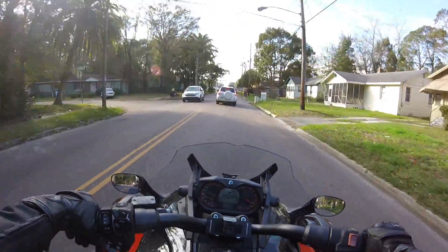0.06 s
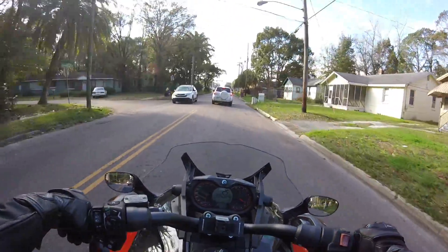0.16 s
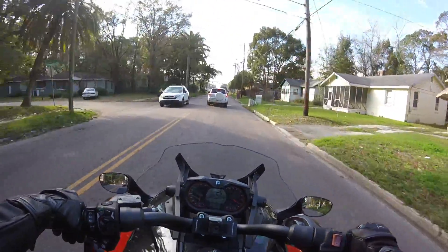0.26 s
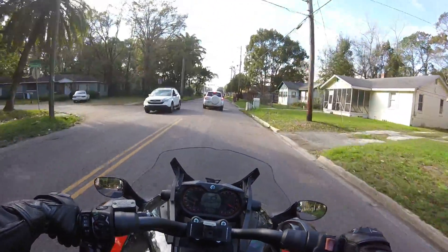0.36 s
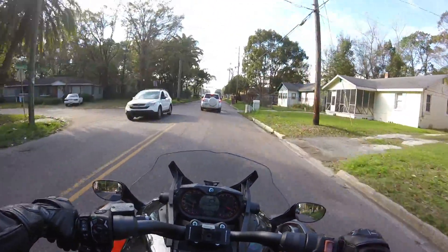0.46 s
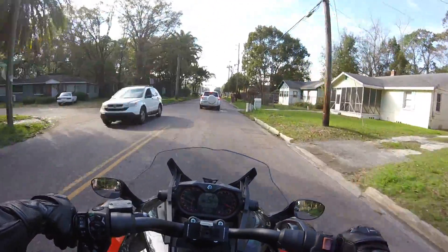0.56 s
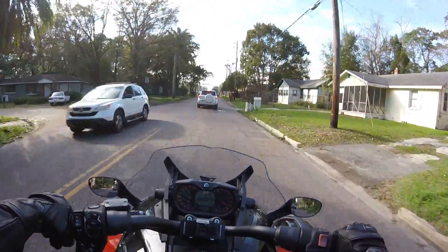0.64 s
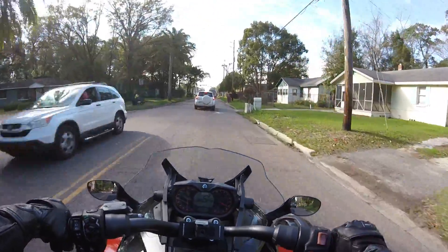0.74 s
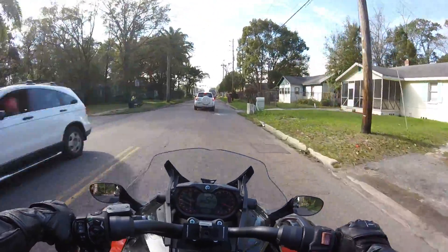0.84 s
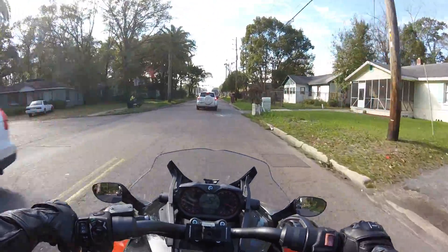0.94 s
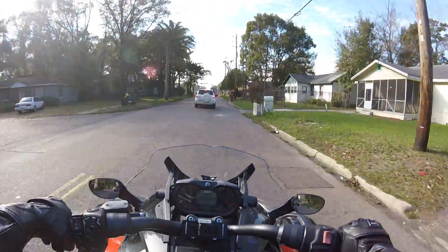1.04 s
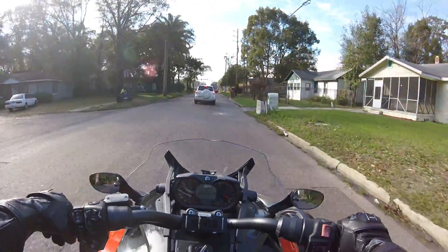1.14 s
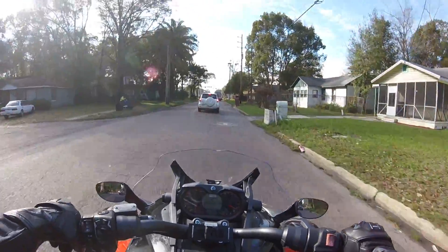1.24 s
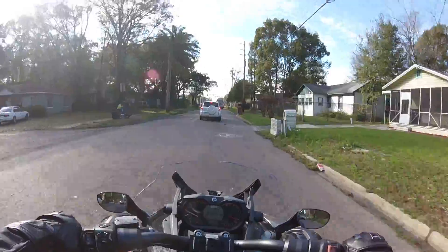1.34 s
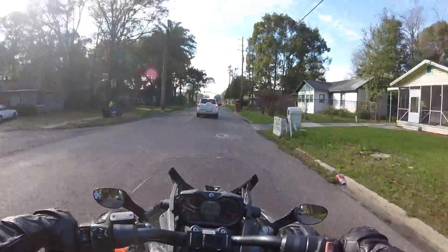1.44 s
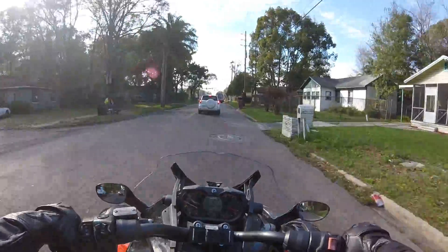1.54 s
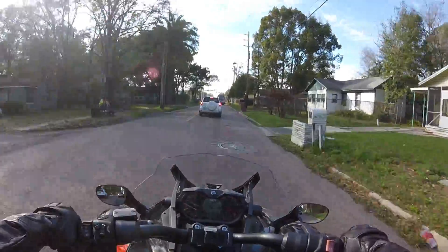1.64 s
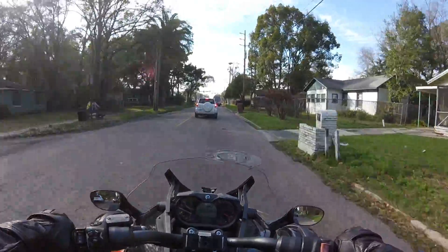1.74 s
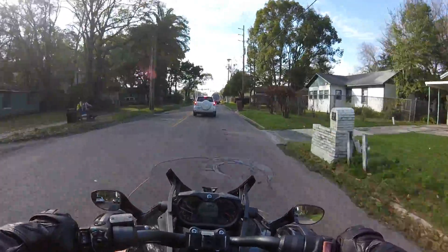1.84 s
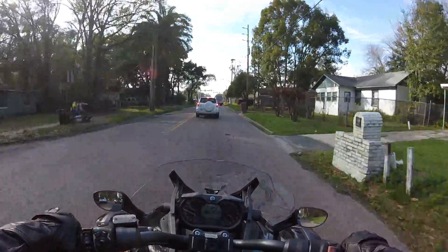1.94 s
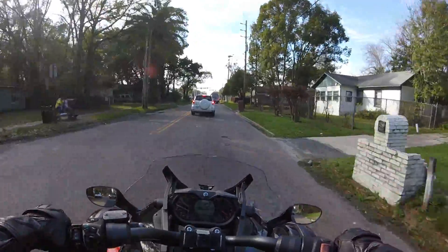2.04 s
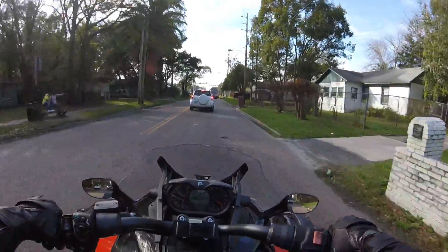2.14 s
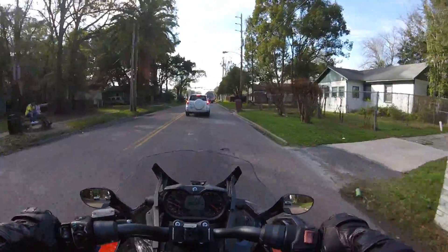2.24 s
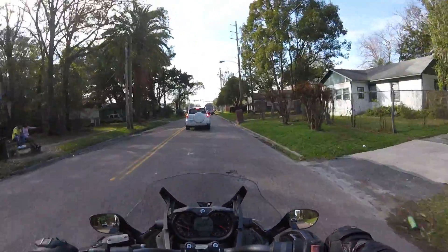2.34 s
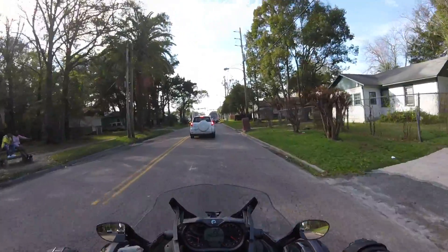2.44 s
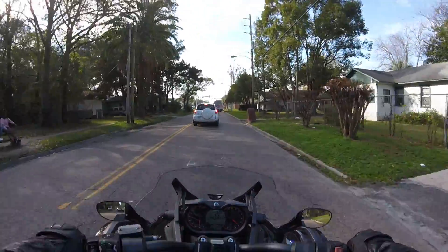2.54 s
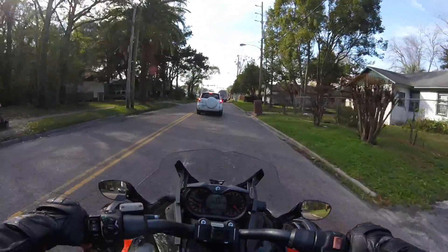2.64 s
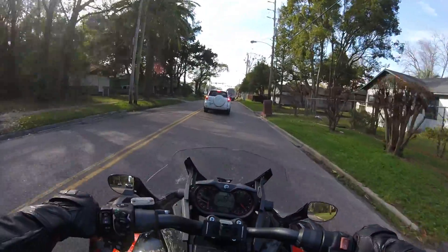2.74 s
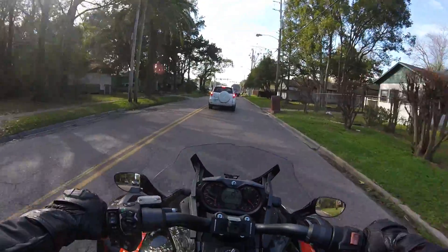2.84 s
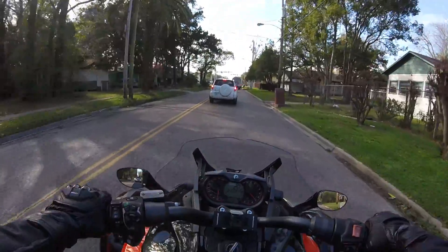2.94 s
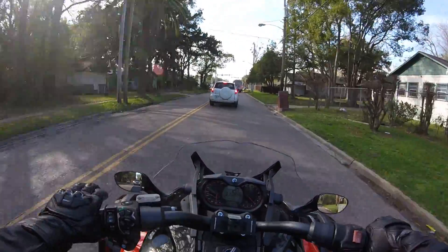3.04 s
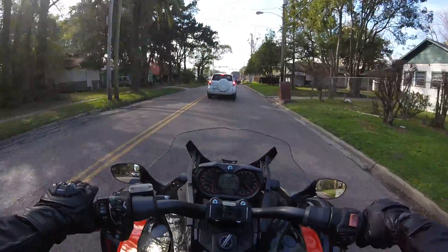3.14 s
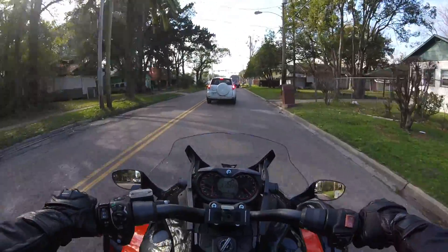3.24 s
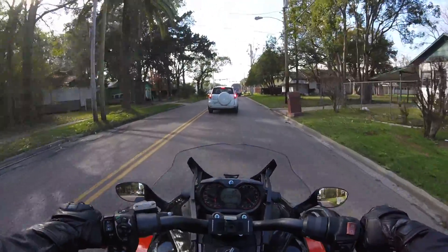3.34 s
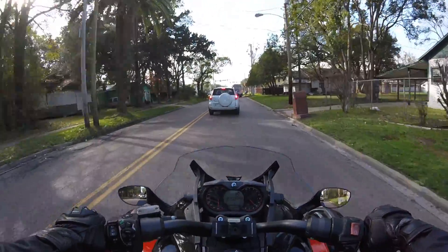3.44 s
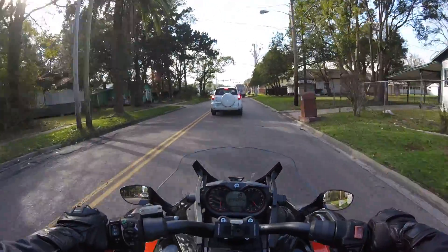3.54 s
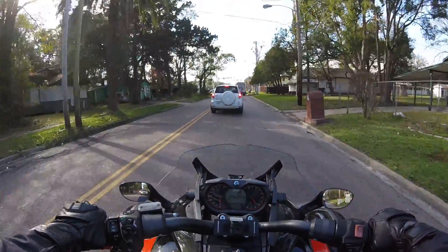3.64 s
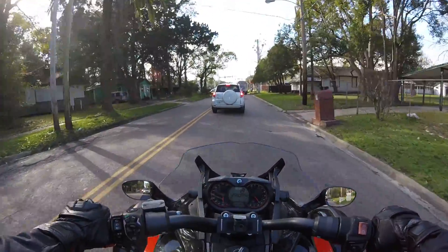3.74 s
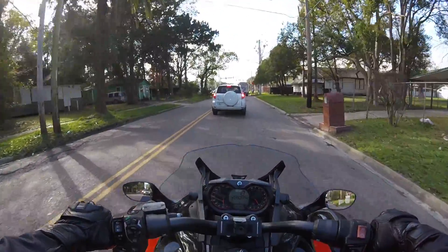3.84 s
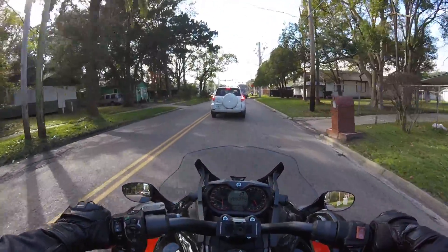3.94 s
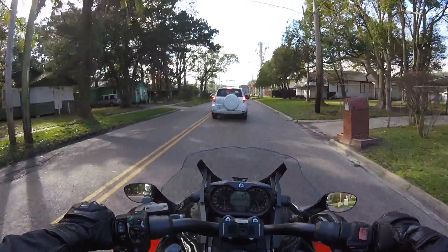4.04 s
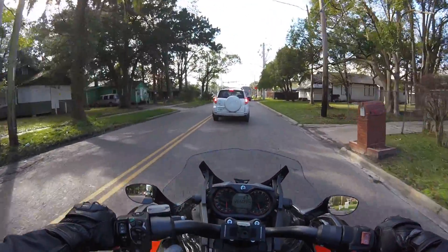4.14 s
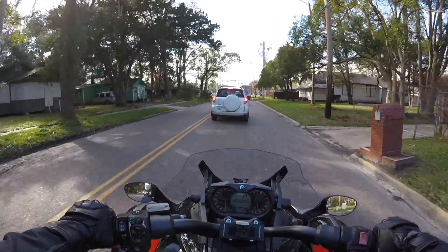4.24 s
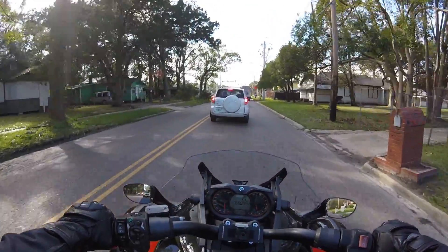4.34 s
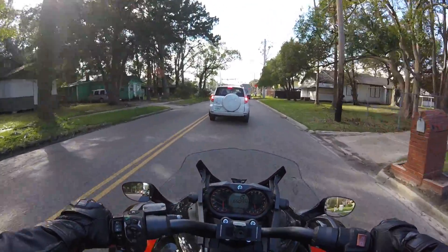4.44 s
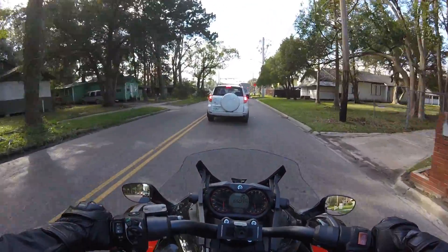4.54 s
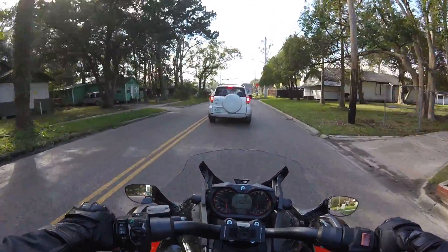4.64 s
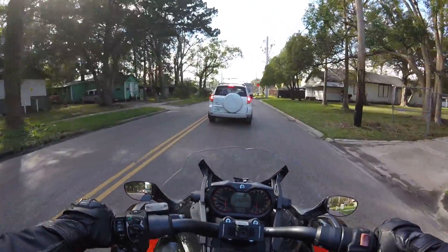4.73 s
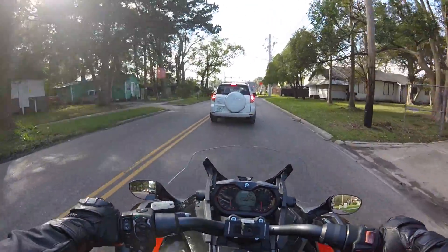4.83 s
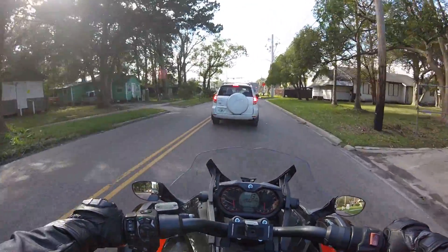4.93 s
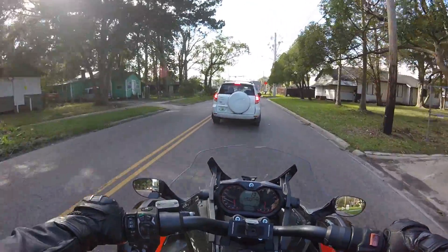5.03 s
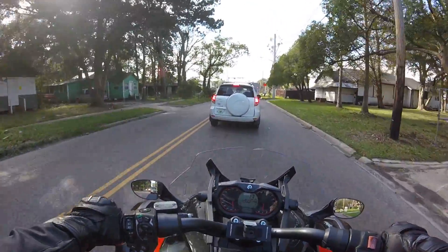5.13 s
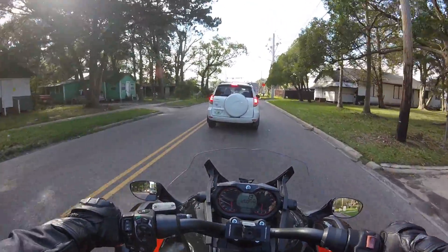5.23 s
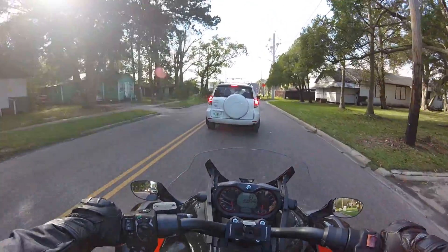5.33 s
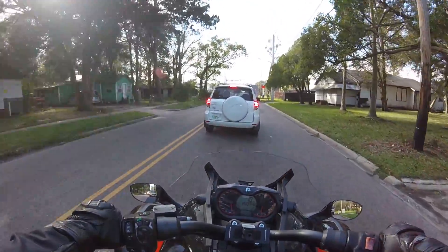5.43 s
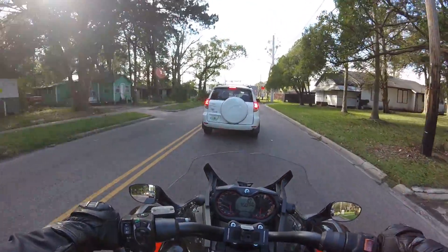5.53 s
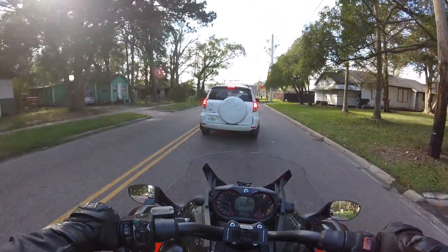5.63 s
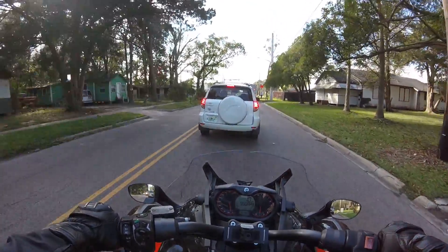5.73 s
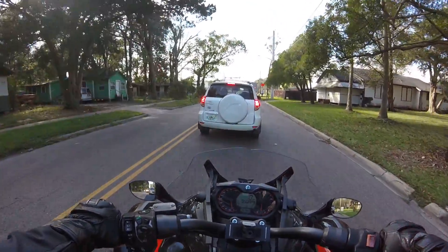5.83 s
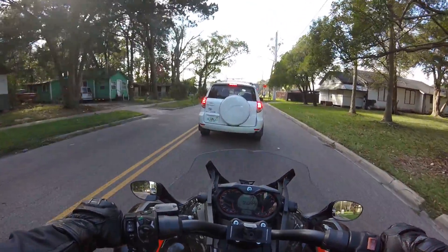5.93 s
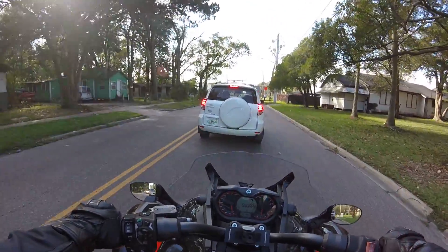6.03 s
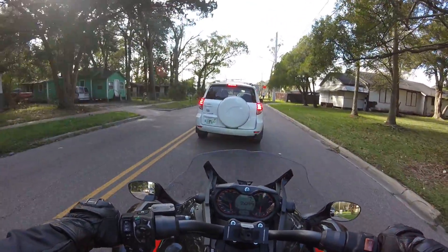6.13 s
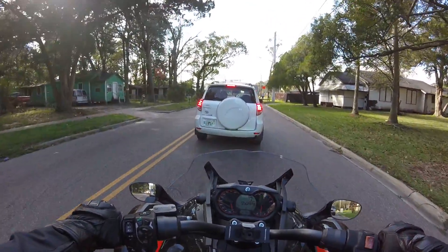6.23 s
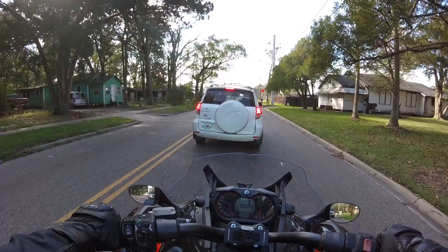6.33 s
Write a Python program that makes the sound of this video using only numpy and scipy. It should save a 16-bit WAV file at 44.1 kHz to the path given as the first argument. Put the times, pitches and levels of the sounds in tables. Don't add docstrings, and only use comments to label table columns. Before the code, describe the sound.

A helmet microphone outdoors captures a three-cylinder engine close below. From 0 to 1.5 seconds it cruises on a deep, nearly steady drone around 95 pulses a second, with mechanical hum, valve-gear whirr, tyre hiss and low wind buffeting. An oncoming car's tyres whoosh softly past around 1.0. At about 1.6 the throttle shuts: the exhaust becomes ragged, burbling with irregular muffled pops, densest from 1.8 to 2.7 and scattered until 4.1. Coarse road rush swells near 1.9, 2.4 and 3.7, with short wind gusts between. A loose bracket taps sharply at 2.54 and loudest at 2.62, then more weakly at 3.1, 3.4 and 3.9. The pitch slides down, dropping fast around 4.1 to 4.4 as the clutch lets go. From 5.1 to 6.4 a quiet, even idle of about 24 soft pulses a second continues, with faint tappet rattle, hiss, a barely audible thin whine and one tiny tap at 6.1.

```python
import sys
import numpy as np
from scipy import signal
from scipy.fft import rfft, irfft, next_fast_len
from scipy.io import wavfile
from scipy.ndimage import map_coordinates

SR = 44100
rng = np.random.default_rng(int(sys.argv[2]) if len(sys.argv) > 2 else 0)


def linear_from_db(decibels):
    return 10 ** (np.asarray(decibels, float) / 20)


def wrap_up_sound(samples):
    columns = np.atleast_2d(samples).T
    tamed = np.clip(columns, -1, 1)
    steps = np.round(tamed * 32767).astype(np.int16)
    wavfile.write(sys.argv[1], SR, steps)


N = 281358
SHUT_S = 1.61
IDLE_HZ = 24

# (time [s], peak level [dB], level of the sharp edge [dB])
POPS = [(1.571, -40.5, 1), (1.682, -44, -8), (1.725, -40, -13), (1.785, -32.5, -13), (1.831, -33, -17),
        (1.873, -32.5, -22), (1.93, -31.5, -10), (2.065, -36, -18), (2.111, -37, -2), (2.192, -33, -5),
        (2.215, -31.5, -2.5), (2.296, -28.5, -2.5), (2.342, -37.5, -4), (2.439, -31.5, -10),
        (2.453, -38.5, -10), (2.6861, -33.5, -12), (2.76, -42, -18), (2.991, -36.5, -21), (3.213, -43, -2),
        (3.363, -37, -11), (3.446, -45, -4), (3.503, -43.5, -10), (3.533, -47, -10), (3.557, -42, -18),
        (3.661, -35, -8), (3.692, -38.5, -8), (3.721, -42, -2), (3.89, -42, -17), (4.043, -36.5, -10),
        (4.061, -37, -12)]


def unit(x):
    return x / np.sqrt(np.mean(x ** 2) + 1e-20)


def along(points, hz):
    f, v = np.transpose(points)
    return np.interp(np.log(hz + 1), np.log(f + 1), v)


def curves(rows):
    s, *cols = np.transpose(rows)
    return [np.interp(np.arange(N) / SR, s, c) for c in cols]


def wobble(rate):
    knots = rng.standard_normal(int(N * rate / SR) + 4)
    return map_coordinates(knots, [np.arange(N) * rate / SR])


def passed(s, takes_s):
    return np.clip((np.arange(N) / SR - s) / takes_s + 0.5, 0, 1)


def bump(s, length_s):
    return np.exp(-(2 * (np.arange(N) / SR - s) / length_s) ** 2 / 2)


def filtered(x, response):
    m = next_fast_len(N + SR // 2)
    return irfft(rfft(x, m) * response(np.fft.rfftfreq(m, 1 / SR)), m)[:N]


def dulled(x, hz, order):
    return filtered(x, lambda f: 1 / (1 + 1j * f / hz) ** order)


def causal(points):
    grid = np.fft.rfftfreq(2 * SR, 1 / SR)
    cepstrum = irfft(np.log(linear_from_db(along(points, grid)) + 1e-6))
    cepstrum[1:SR] *= 2
    cepstrum[SR + 1:] = 0
    h = np.exp(rfft(cepstrum))
    return lambda hz: np.interp(hz, grid, h.real) + 1j * np.interp(hz, grid, h.imag)


def resonant(modes, flip=-1):
    def response(f):
        total = 0
        for k, (center, width, db) in enumerate(modes):
            mode = 1j * f * width / (center * center - f * f + 1j * f * width)
            total = total + flip ** k * linear_from_db(db) * mode
        return total
    return response


def noise(spectrum):
    return unit(filtered(rng.standard_normal(N), lambda hz: linear_from_db(along(spectrum, hz))))


def struck(times, db, modes, flip=-1):
    blows = np.zeros(N)
    blows[np.round(times * SR).astype(int)] = linear_from_db(db) * SR / (2 * np.pi * modes[0][1])
    return filtered(blows, resonant(modes, flip))


def crank():
    # (time [s], firing rate [Hz])
    firing = [(0.0, 97.17), (0.75, 93.79), (1.125, 95.44), (1.5, 93.8), (1.625, 90.08), (2.0, 89.54),
              (2.375, 83.06), (3.375, 73.03), (3.875, 64.07), (4.125, 50.93), (4.29, 44.6), (4.36, 32.8),
              (4.56, 34.4), (4.75, 29.53), (5.125, 24.34), (5.375, 24.2), (5.75, 24.1), (6.38, 22.9)]
    hz = curves(firing)[0]
    return hz, np.cumsum(hz) / SR + 0.007 * wobble(25)


def exhaust_note(hz, turns):
    # (time [s], 1st multiple level [dB], 2nd multiple level [dB])
    low_tones = [(0, -22.5, -34.5), (.65, -23, -43.5), (1.5, -26, -31.5), (1.62, -28.5, -34.5),
                 (1.76, -21.5, -38.5), (2.5, -28, -36.5), (3.2, -24, -28.5), (3.8, -23, -27.5),
                 (4.03, -23.5, -29), (4.14, -27, -48), (4.38, -34.5, -54), (5.1, -42, -51), (5.4, -41, -44),
                 (5.7, -39, -43), (6.38, -30, -43.5)]
    # (firing rate [Hz], level [dB])
    even = [(23, -39), (24.3, -41), (27, -41), (29.5, -39), (34, -44.5), (45, -46), (64, -38), (75, -49.5),
            (88, -47.5), (95, -59.5)]
    # (firing rate [Hz], lead [radians])
    second_lead = [(24, .8), (30, .2), (60, -.6), (72, -1), (78, -1.8), (88, -2.6), (94, -4)]
    # (frequency [Hz], gain [dB])
    silencer_gain = [(15, -10), (50, -6.5), (75, -3), (97, -7), (118, 3), (133, 9), (148, -1.5), (170, -5),
                     (205, -6), (225, -21.5), (240, -28.5), (262, -29), (300, -38), (480, -29.5),
                     (700, -45.5), (1500, -69.5)]
    slip_s, slip_takes_s = 4.32, 0.12
    pulse_lead = 1.7

    def sway(db):
        return np.sqrt(2) * linear_from_db(db * wobble(14))

    first_db, second_db = curves(low_tones)
    rocking_lead = 1.6 * np.arctan2(1.5, hz - 28)
    slip = 1 - np.exp(-np.maximum(np.arange(N) / SR - slip_s, 0) / slip_takes_s)
    first = np.cos(2 * np.pi * (turns + slip - 0.3) + rocking_lead)
    second = np.cos(4 * np.pi * (turns + 0.24) + along(second_lead, hz))
    third = np.cos(6 * np.pi * turns + 0.4)
    note = linear_from_db(first_db - 0.4) * sway(1.1) * first
    note = note + linear_from_db(second_db - 0.4) * sway(1.2) * second
    note = note + linear_from_db(second_db - 17.5) * sway(2.7) * third

    even_db = along(even, hz)
    silencer = causal(silencer_gain)
    for k in np.arange(3, 14):
        pulse = silencer(k * hz) * np.exp(2j * np.pi * k * (turns + 0.27) + 1j * pulse_lead)
        note = note - linear_from_db(even_db) * sway(0.7) * np.real(pulse)
    return note


def uneven_db():
    open_db, shut_db, idle_db, calms_db_per_s = -45, -22, -47.5, 3.5
    shut = passed(SHUT_S, 0.19)
    free = passed(4.206, 0.2)
    ragged_db = shut_db - calms_db_per_s * (np.arange(N) / SR - SHUT_S)
    return (1 - shut) * open_db + (shut - free) * ragged_db + free * idle_db


def exhaust_burble(hz, turns):
    # (frequency [Hz], gain [dB])
    burble_gain = [(15, -21.5), (50, -2), (90, -0.5), (130, 3.5), (190, -5), (250, -24), (320, -18),
                   (370, -26.5), (480, -22.5), (600, -22.5), (650, -52), (900, -48), (2000, -87),
                   (4000, -120)]
    quench_db, quench_s = -12, 0.04
    count = np.floor(turns - 0.42)
    fires = np.diff(count, prepend=count[0]) > 0
    sizes = np.tanh(0.58 * rng.standard_normal(N)) + 0.26 * np.cos(np.pi * count)
    burble = filtered(fires * sizes / np.sqrt(hz), causal(burble_gain))
    backfiring = sum(bump(s + 0.012, quench_s) for s, db, _ in POPS if db > -36)
    return linear_from_db(uneven_db() + quench_db * np.minimum(backfiring, 1)) * unit(burble)


def pops():
    # (frequency [Hz], width [Hz], level [dB])
    pipe = [(500, 90, 1.5), (745, 125, -2.5), (270, 120, -14)]
    # (frequency [Hz], width [Hz], level [dB])
    thump_modes = [(120, 42, 0), (165, 70, -5)]
    # (frequency [Hz], width [Hz], level [dB])
    edge_modes = [(1190, 580, 11), (1720, 300, -19.5)]
    return_s, return_db = 0.0112, -6
    s, db, edge_db = np.transpose(POPS)

    edge = struck(s + 0.0015, db + edge_db + 12, edge_modes)
    edge = filtered(edge, resonant([(1400, 1100, 0)]))
    thump_db = -3 + 0.6 * db
    thump = dulled(struck(s + 0.001, thump_db + 4, thump_modes, flip=1), 600, order=2)

    lit = np.zeros(N)
    lit[np.round((s + 0.007) * SR).astype(int)] = linear_from_db(db + 12.0)
    dying = linear_from_db(-60 * np.arange(SR // 5) / SR / 0.09)
    flame = signal.fftconvolve(lit, dying)[:N]
    rasp = filtered(flame * rng.standard_normal(N), resonant(pipe))
    ring = dulled(struck(s + 0.0013, db + 11, pipe, flip=1) + rasp, 1000, order=3)
    ring = ring + linear_from_db(return_db) * np.roll(ring, round(return_s * SR))
    return -dulled(ring + edge + thump, 1800, order=2)


def block(turns):
    # (multiple of the engine cycle, level [dB])
    cycle_tones = [(4, -49), (5, -54), (7, -58), (10, -55.5), (11, -64), (12, -60), (13, -62.5),
                   (14, -62.5), (15, -58), (16, -61), (17, -75), (18, -59.5), (19, -58.5), (20, -67),
                   (24, -65.5), (36, -61)]
    # (time [s], level [dB])
    load = [(0, 3.5), (.5, 4.5), (1, 2.5), (1.3, 1), (1.55, 5), (1.65, 2.5), (2.5, -20), (4, -28.5),
            (6.38, -33.5)]
    cycles = turns / 3
    hum = 0
    for k, db in cycle_tones:
        tone = np.sin(2 * np.pi * (round(k) * cycles + rng.random()))
        hum = hum + linear_from_db(db + 1.4 * wobble(8.7)) * tone
    return np.sqrt(2) * linear_from_db(curves(load)[0]) * hum


def gear_level(hz):
    idle_db, db_per_octave, load_db = -56, 6, 1.5
    return idle_db + db_per_octave * np.log2(hz / IDLE_HZ) + load_db * (1 - passed(SHUT_S, 2.3))


def valve_gear(hz, turns):
    # (frequency [Hz], level [dB per Hz])
    gear_spectrum = [(500, -21), (900, -10), (1200, -6.5), (1500, -5), (2000, -10), (2900, -11.5),
                     (3600, -13), (3900, -19), (5000, -26), (5400, -29), (6800, -30), (8000, -37),
                     (11000, -49), (13000, -76)]
    # (frequency [Hz], width [Hz], level [dB])
    fairing = [(1273, 200, 6.5), (1656, 150, 6), (1506, 58, -9), (2620, 233, 8), (3214, 180, 6.5),
               (3460, 120, 7), (5780, 240, 11)]

    def colour(f):
        peaks_db = sum(db / (1 + (2 * (f - c) / w) ** 2) for c, w, db in fairing)
        return linear_from_db(along(gear_spectrum, f) + peaks_db)

    beat = linear_from_db(0.95 * np.cos(2 * np.pi * (turns + 0.033)) + 0.13 * wobble(40))
    gear = unit(filtered(beat * rng.standard_normal(N), colour))
    return linear_from_db(gear_level(hz) + 1.12 + 0.3 * wobble(10.0)) * gear


def tappets(turns):
    # (frequency [Hz], width [Hz], level [dB])
    tappet_modes = [(1647, 160, -1), (2613, 160, -2.5), (3420, 170, -7)]
    beat = linear_from_db(2 * np.cos(2 * np.pi * (turns + 0.05)))
    rattle = filtered(beat * rng.standard_normal(N), resonant(tappet_modes))
    return linear_from_db(-62) * unit(filtered(rattle, resonant(tappet_modes)))


def ticks():
    # (time [s], peak level [dB])
    taps = [
        (1.4703, -34),
        (2.5443, -20.5),
        (2.623, -15.5),
        (2.709, -29),
        (3.1246, -24),
        (3.4454, -31.5),
        (3.8563, -34),
        (6.122, -40),
    ]
    # (frequency [Hz], width [Hz], level [dB])
    bracket = [(1610, 255, 3), (2160, 1100, -10.5), (3250, 360, -8), (4870, 700, -30)]
    # (frequency [Hz], width [Hz], level [dB])
    contact = [(2360, 3500, -3)]
    s, db = np.transpose(taps)
    tap = filtered(struck(s + 0.0005, db + 5, bracket), resonant(contact))
    return -dulled(tap, 4500, order=3)


def road_rush(hz):
    # (frequency [Hz], level [dB per Hz])
    road_spectrum = [(130, -40.5), (220, 6), (284, 1.5), (345, -3), (487, 0.5), (537, -8), (586, -5),
                     (716, -7.5), (988, -18), (1240, -8), (1500, -20.5), (1950, -30), (3300, -120)]
    # (time [s], length [s], extra level [dB])
    rough = [
        (1.115, 0.32, 6),
        (1.89, 0.26, 6),
        (2.446, 0.66, 9),
        (3.7, 0.18, 7.5),
    ]
    idle_db, db_per_octave = -54.5, 4.5
    rough_db = sum(db * bump(s, length_s) for s, length_s, db in rough)
    road_db = idle_db + db_per_octave * np.log2(hz / IDLE_HZ) + rough_db
    rush = unit(linear_from_db(0.83 * wobble(30)) * noise(road_spectrum))
    return linear_from_db(road_db - 4.5) * rush


def tyres(hz):
    # (frequency [Hz], level [dB per Hz])
    tread = [(3700, -45), (4350, -11.5), (4700, -8), (5300, -15.5), (6100, -7), (6500, -6), (7200, -14.5),
             (9000, -25.5), (12000, -24.5), (13200, -39.5), (14000, -66)]
    return linear_from_db(0.76 * (gear_level(hz) + 42.0) - 63.5 + 1.2 * wobble(22)) * noise(tread)


def wind(hz):
    # (frequency [Hz], level [dB per Hz])
    buffet = [(2, -40), (10, -6), (22, 0), (38, -9), (57, -6), (75, -15), (130, -21), (200, -29),
              (300, -45), (800, -120)]
    # (time [s], length [s], peak level [dB])
    gusts = [(0.173, 0.11, -26), (0.93, 0.25, -30), (1.635, 0.12, -28.5), (1.89, 0.19, -25),
             (2.274, 0.064, -25), (2.434, 0.096, -26.5), (2.652, 0.083, -25), (2.96, .07, -38),
             (3.176, 0.084, -32.5), (3.317, 0.086, -28), (3.512, 0.069, -29), (4.273, 0.19, -29),
             (4.843, 0.35, -37.5), (5.21, 0.23, -38.5)]
    idle_db, db_per_octave = -44.5, 6.5
    lumps = linear_from_db(1.5 * wobble(9))
    breeze = linear_from_db(idle_db + db_per_octave * np.log2(hz / IDLE_HZ))
    strength = breeze + sum(linear_from_db(db) * bump(s, length_s) for s, length_s, db in gusts)
    return linear_from_db(1.5) * strength * unit(np.tanh(0.5 * lumps * noise(buffet)))


def car():
    # (frequency [Hz], level [dB per Hz])
    car_spectrum = [(300, -120), (450, -29), (620, -4.5), (700, -4), (880, -3), (1000, -10.5), (1400, -32),
                    (2500, -120)]
    passes_s, length_s, level_db = 1.04, 0.28, -51.5
    return linear_from_db(level_db + 2.3 * wobble(22)) * bump(passes_s, length_s) * noise(car_spectrum)


def electronics():
    # (frequency [Hz], level [dB per Hz])
    hiss = [(5000, -19), (7000, -11), (9000, -4.5), (11000, -7), (12300, -18.5), (13500, -32.5),
            (15000, -44)]
    # (frequency [Hz], level [dB])
    whine_tones = [(9592, -96), (9651, -87.5)]
    t = np.arange(N) / SR
    whine = 0
    for hz, db in whine_tones:
        tone = np.sin(2 * np.pi * hz * t + 0.3 * wobble(20))
        whine = whine + np.sqrt(2) * linear_from_db(db + 1.5 * wobble(7.1)) * tone
    return whine + linear_from_db(-80.0) * noise(hiss)


def scene():
    hz, turns = crank()
    exhaust = exhaust_note(hz, turns) + exhaust_burble(hz, turns) + pops()
    engine = exhaust + block(turns) + valve_gear(hz, turns) + tappets(turns)
    road = road_rush(hz) + tyres(hz) + car()
    return (engine + ticks() + road + wind(hz) + electronics())[None]


def band_limit(x):
    return signal.sosfilt(signal.butter(12, 13000, fs=SR, output="sos"), x)


def record(dry):
    return band_limit(dry)


dry = scene()
out = record(dry)
wrap_up_sound(out)
```